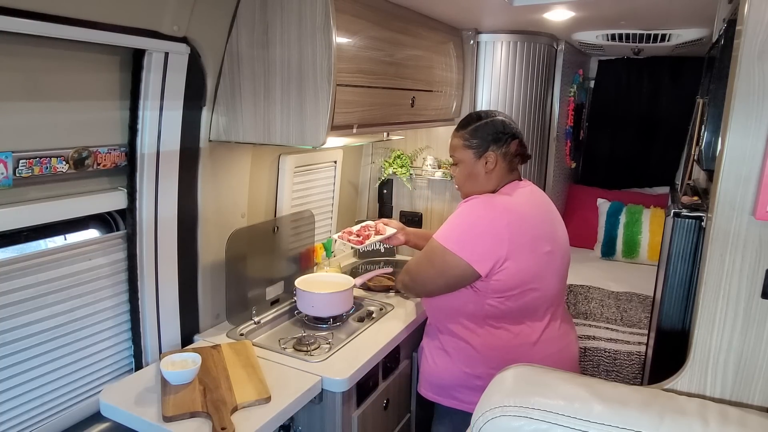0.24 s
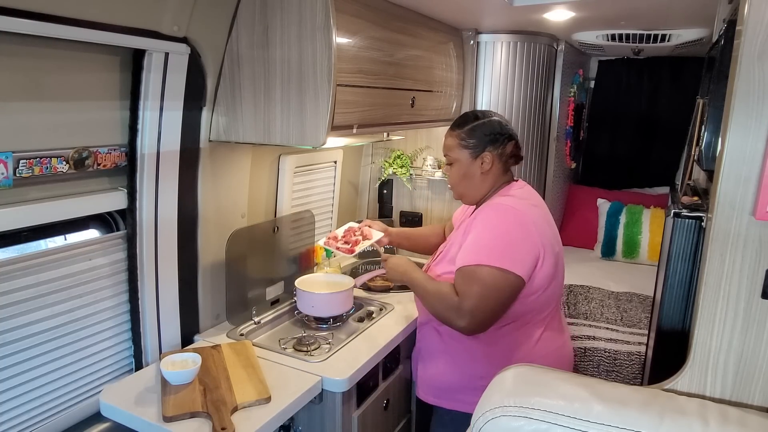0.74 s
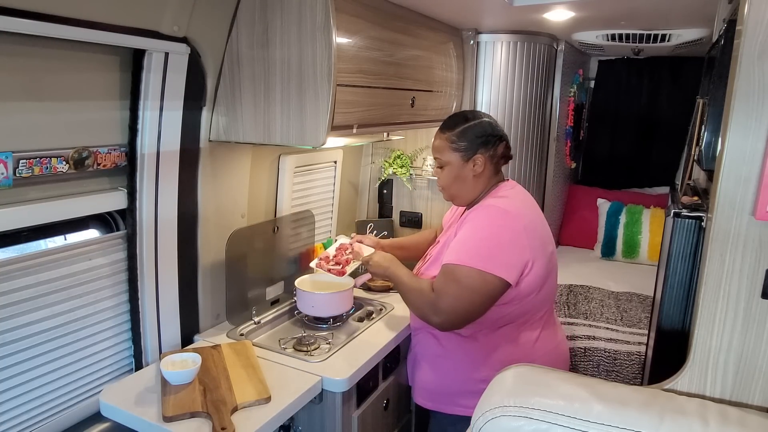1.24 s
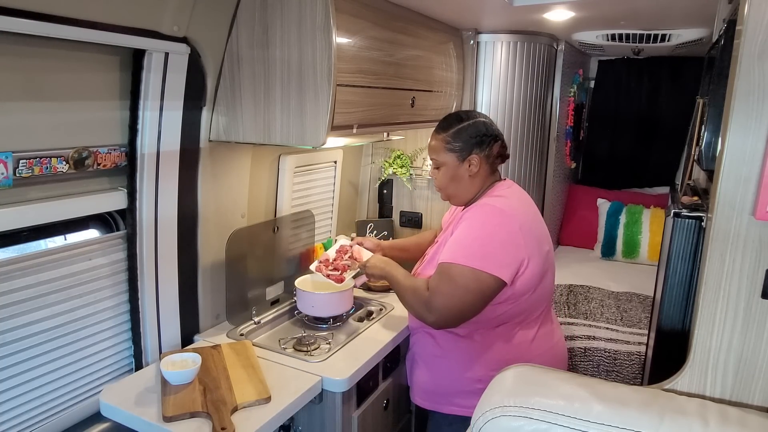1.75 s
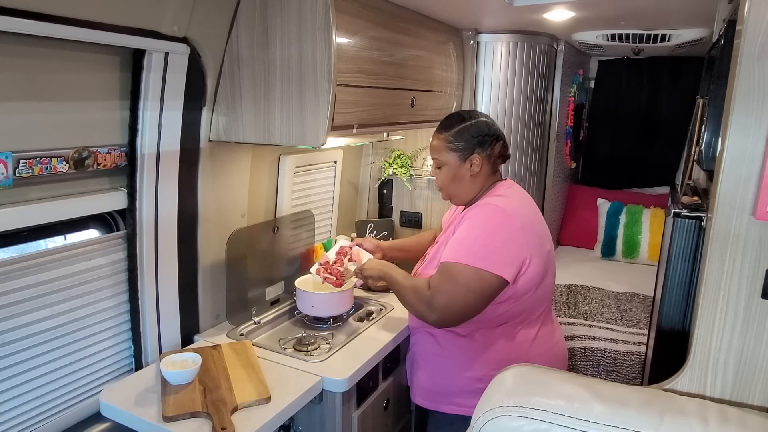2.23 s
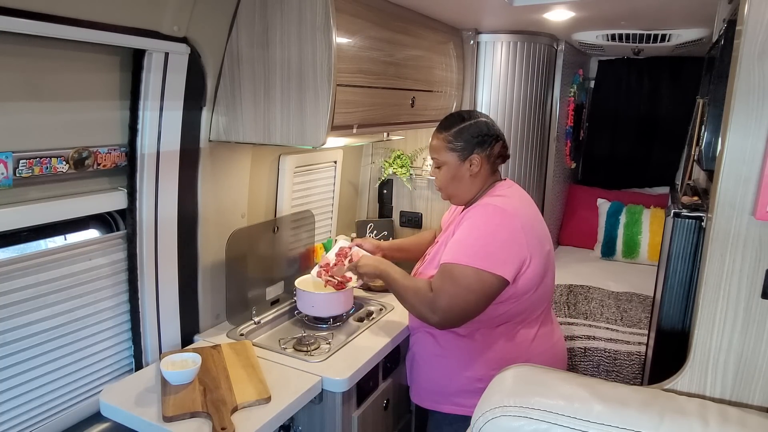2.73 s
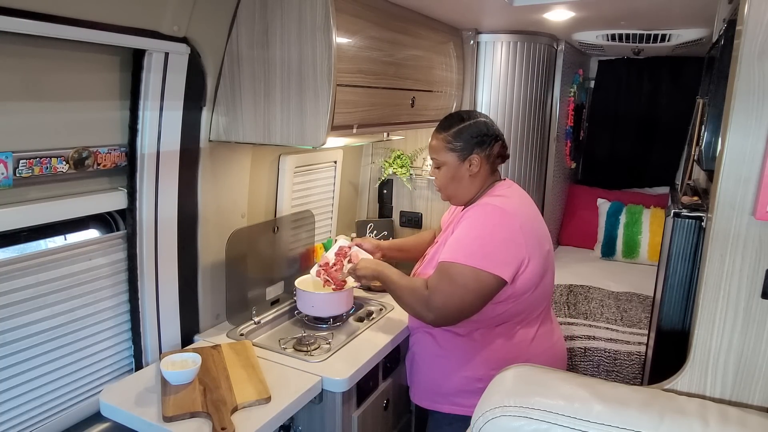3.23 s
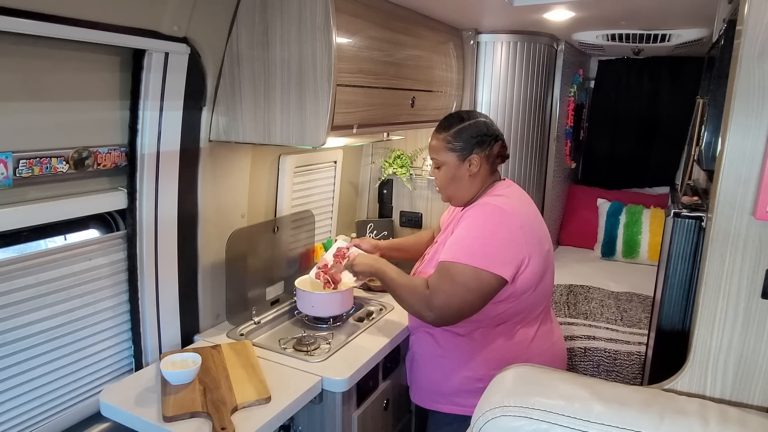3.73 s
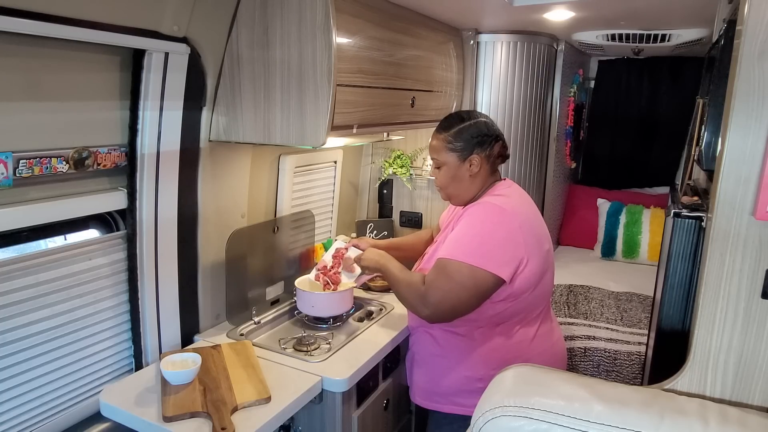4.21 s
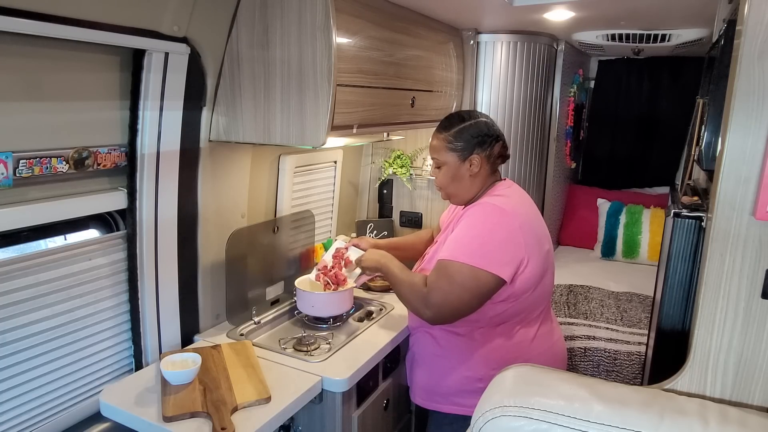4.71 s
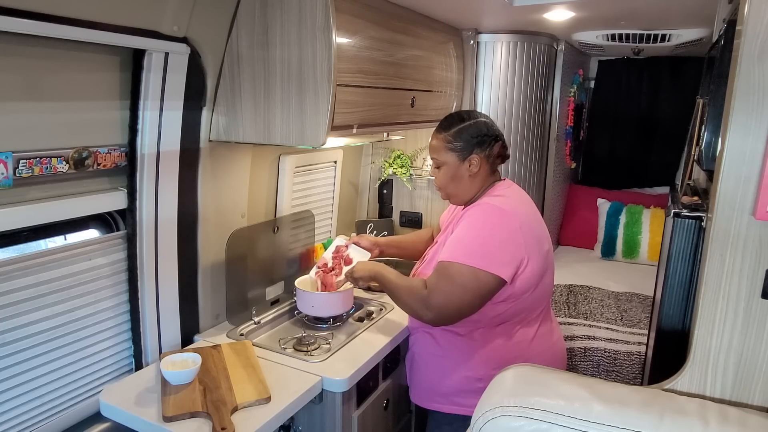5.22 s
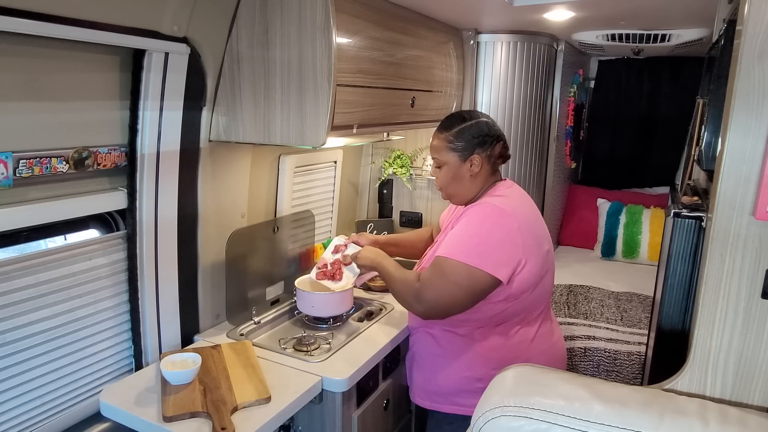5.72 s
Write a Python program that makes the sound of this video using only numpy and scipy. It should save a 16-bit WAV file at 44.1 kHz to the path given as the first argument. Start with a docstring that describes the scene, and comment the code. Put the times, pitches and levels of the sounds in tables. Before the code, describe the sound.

A hollow worktop clatter, then hard utensil knocks on a saucepan with wet meat slaps and crackling rustles, over low rumble and thin regular chirps.

```python
"""A hollow clatter on the worktop comes first, in the small kitchen of a camper van, over low rumble and hiss.
Raw beef is then pushed off a plate into a saucepan on a gas hob, with crackling rustles, wet slaps and pops.
A utensil knocks plate and pan, and the pan rocks on its grate. Blows are noise plus damped modes off close walls.
A faint whistle of narrow tones comes and goes; thin, regular electronic chirps are bursts of narrow noise.
All is placed before a microphone pair by level, phase and likeness between left and right."""
import sys
import numpy as np
from scipy import signal
from scipy.fft import rfft, irfft
from scipy.io import wavfile
from scipy.ndimage import uniform_filter1d

SR = 44100
rng = np.random.default_rng(int(sys.argv[2]) if len(sys.argv) > 2 else 0)


def transcribe(signal):
    """Save signal, clipped to [-1, 1], as a 16-bit WAV file at the path in sys.argv[1]."""
    frames = np.atleast_2d(signal).T
    limited = np.clip(frames, -1, 1)
    pcm = np.round(limited * 32767).astype(np.int16)
    wavfile.write(sys.argv[1], SR, pcm)


N = 262836
TIME = np.arange(N) / SR   # s into the scene
AGE = np.arange(-256, 24320) / SR   # s since a single sound began

# The microphone pair. Each row: frequency in Hz, likeness of left and right from 0 to 1,
# phase by which left leads in radians, level of left over right in dB.
MIC_PAIR = [(60, 0.94, 0.43, -3.5), (197, 0.89, 0.43, 0.1), (655, 0.5, 1.76, -1.5), (1150, 0.6, 1.95, 1.5),
            (2700, 0.8, 1.59, 1.54), (4900, 0, 2.19, -0.3), (11900, 0, 1.94, 5.5)]
CUTOFF_HZ = 16000

# Rumble of the place. Each row: frequency in Hz, relative density in dB.
RUMBLE_COLOUR = [(12, -43), (20, -2.5), (75, 0.5), (119, -25.5), (300, -23.5), (341, -22), (398, -19.5),
                 (820, -31.5), (1180, -24.5), (1340, -30), (1450, -28), (3220, -30), (3470, -26.5),
                 (3950, -27), (9500, -39.5), (12400, -66), (20900, -120)]
# Hiss at the top. Each row: frequency in Hz, relative density in dB.
HISS_COLOUR = [(7000, -40), (9500, -6), (11000, 0), (16000, 0)]
RUMBLE_DB, HISS_DB = -58.31, -74
# Tones of the whistle. Each row: centre in Hz, width in Hz, relative level in dB.
WHISTLE_TONES = [(3397, 5, 7), (3480, 14, -7), (3785, 12, -17)]
# Swells of the whistle. Each row: start in seconds, length in seconds, level in dB before trim,
# release in dB per second.
WHISTLE_SWELLS = [(0.93, 0.5, -71, 84.5), (2.32, 0.1, -66, 31), (2.92, 0.077, -65.5, 152)]
WHISTLE_ATTACK_DB_PER_S, WHISTLE_REST_DB = 132, -85.5   # the rest level lies under the swells

# One round of electronic chirping. Each row: offset into the round in seconds, level in dB before trim,
# centre in Hz.
CHIRPS = [(0.009, -55, 11400), (0.010, -57, 12200), (0.049, -53, 11900), (0.064, -57, 11300)]
CHIRP_START_S, CHIRP_PERIOD_S = -0.0318, 0.1603

# Edges of the bands in which a blow is levelled, in Hz.
BAND_EDGES_HZ = [60, 125, 350, 850, 1500, 2800, 4500, 7500, 10800]
THUD_HZ = 181   # where the weight of a blow is heard
# Things handled on the worktop. Each row: start in seconds, level in dB before trim, contact pitch in Hz,
# softness in dB lost per octave above it, thud in dB before trim,
# ringing over contact noise in dB before the bands are levelled.
CLUNKS = [(0.0, -43, 1356, 4, -41.5, -0.5), (0.102, -42, 1150, 10, -56, 4),
          (0.3845, -24.5, 1204, 2.63, -27, 2), (0.8155, -44.5, 600, -2, -57.5, -8)]
# Wet meat shifts, peels off the plate and lands. Each row: the same six columns and units as the clunks.
SLAPS = [(0.528, -56.5, 1254, -1, -76, -34), (3.701, -47, 2784, -0.5, -84, -25),
         (3.748, -34.5, 558, 2.5, -70, -0.5), (3.784, -40, 1200, 5, -56, -31),
         (5.272, -54, 1180, 0.5, -77, -24), (5.315, -46, 600, 1, -68, -8),
         (5.394, -42.5, 1790, -0.7, -51, 0), (5.467, -38.5, 1500, 10, -77, -10)]
# Utensil and plate knock on the pan. Each row: the same six columns and units as the clunks.
KNOCKS = [(2.399, -14, 2200, 9.5, -45.5, 3.5), (2.526, -19, 980, 13.5, -57, 7),
          (2.545, -24.5, 1560, 12.5, -40.5, 8), (2.575, -29.5, 1250, 11.5, -70, 4.5),
          (3.009, -27, 1310, 6.5, -55, 3), (3.303, -22.5, 1270, 7, -50.5, 5),
          (4.187, -44, 1144, 3.5, -52.5, -4.5), (4.279, -21, 1816, 5.5, -53, 0.5),
          (4.311, -18, 1380, 4, -41.5, 1.5), (4.445, -19, 1500, 6, -40, 4), (4.793, -42.5, 1197, 5, -54, 7),
          (4.895, -44, 1260, 6.5, -54.5, 4), (4.9945, -23.5, 1504, 5, -44, 7),
          (5.249, -40.5, 1380, 5.5, -52, 0.5), (5.825, -35.5, 1334, 7.5, -56, 3.5)]
# Modes of the worktop. Each row: nominal pitch in Hz, nominal relative level in dB, t60 in seconds.
WORKTOP_MODES = [(86.8, 16.5, 0.38), (167.3, -7, 0.36), (195, 2, 0.25), (217.6, -7.5, 0.27),
                 (293, -16.5, 0.25), (574, 10.5, 0.25), (805, -8.5, 0.33), (1366, -1.5, 0.29),
                 (1430, 10, 0.14), (1796, -7.5, 0.36), (1957, 2, 0.23), (2045, 4.5, 0.11),
                 (2107, 10.5, 0.073), (2246, 1, 0.23), (2610, 0, 0.16), (2970, 10, 0.08), (2940, -6, 0.23),
                 (3646, 17.5, 0.061)]
# Modes of the pan's hollow. Each row: nominal pitch in Hz, nominal relative level in dB, t60 in seconds.
HOLLOW_MODES = [(577, 6.5, 0.49), (1740, -9, 0.3)]
# Modes of the pan. Each row: nominal pitch in Hz, nominal relative level in dB, t60 in seconds.
PAN_MODES = [(84.6, -14.5, 0.4), (164.1, -10.5, 0.28), (213.9, -15, 0.41), (576, -5.5, 0.23),
             (801, -18, 0.15), (1050, -9, 0.14), (1172, -14, .13), (1445, -10, 0.16), (1700, -5, .11),
             (1775, -1.5, .13), (1966, -3.5, .11), (2094, 0, .11), (3288, -4, .08), (3392, -3, .085),
             (3802, -5, .08), (2166, -7, .11), (2307, -5.5, 0.074), (2450, -9.5, 0.09), (2564, -1, 0.073),
             (2960, -13, 0.087), (3120, -9.5, 0.14), (4180, -11.5, 0.074), (4730, -23, 0.13),
             (5280, -21, 0.1), (5580, -8.5, 0.025), (5950, -23.5, 0.13), (6280, -18.5, 0.055),
             (7100, -15, 0.047)]
# Contact noise on the worktop. Each row: frequency in Hz, relative density in dB.
CLUNK_COLOUR = [(60, -4.5), (200, -21), (330, -13), (500, -9.5), (800, -8.5), (1200, -11.5), (1600, -14),
                (2300, -13.5), (3300, -6), (4300, -8), (6500, -24), (10000, -46.5), (16000, -54)]
# Wet contact noise. Each row: frequency in Hz, relative density in dB.
SLAP_COLOUR = [(150, -20), (400, -2.5), (650, 11), (1200, 0), (2500, -15), (4300, -17.5), (5400, -11),
               (8000, 4.5), (11000, -7.5), (16000, -4.5)]
# Contact noise on the pan. Each row: frequency in Hz, relative density in dB.
KNOCK_COLOUR = [(71, -38.5), (120, -18.5), (177, -2), (493, -14), (569, -14.5), (643, -3.5), (1030, -8),
                (1620, -8.5), (1790, 0.5), (3050, -6.5), (3380, -4.5), (4980, -25.5), (7050, -29.5),
                (11800, -38.5), (16000, -89.5)]

# Crackling rustles: one at the worktop, faint treble ticks, and meat sliding into the pan.
# Each row: start in seconds, length in seconds, level in dB before trim, release in dB per second.
RUSTLES = [(0.36, 0.13, -50.5, 95), (1.51, 0.061, -64.5, 393), (3.70, 0.1, -52.5, 525),
           (4.08, 0.011, -63.5, 498), (5.28, 0.14, -50.5, 190)]
# Rustling contact noise. Each row: frequency in Hz, relative density in dB.
RUSTLE_COLOUR = [(300, -18), (1200, -10), (3000, -6.5), (4500, -2), (8000, -3), (11000, -2), (16000, -16)]
RUSTLE_ATTACK_DB_PER_S = 312
POURING_FROM_S = 3.0   # only later rustles squelch

# The pan tips on its grate and falls back, often almost unheard. Each row: start in seconds,
# tip level in dB before trim, dB lost in falling back (negative: the return is louder).
ROCKS = [(0.532, -51, 5.5), (2.644, -37, 24), (2.736, -50.5, 22), (3.077, -39, 34), (3.828, -35, 24),
         (3.902, -35, 13.5), (4.258, -35, -11), (4.548, -46.5, 20), (4.814, -37.5, 1), (4.926, -38.5, -6),
         (5.068, -35.5, 5), (5.306, -32.5, 32), (5.446, -33, 7.5), (5.547, -44, 5), (5.654, -38.5, 11),
         (5.727, -44, 7.5)]
# Thud of a rocking pan. Each row: frequency in Hz, relative density in dB.
ROCK_COLOUR = [(100, -5), (180, -3.5), (340, -3.5), (480, -14), (750, -1), (1100, -12.5), (1550, -12),
               (2400, -11.5), (4000, -22.5), (9000, -43), (16000, -60)]
FALL_BACK_S = 0.04   # from the tip to the fall back
# nominal pitch of a tock of that level before trim; harder ones are higher
ROCK_HZ, ROCK_AT_DB, ROCK_HZ_PER_DB = 1104, -39, 6.5

# Single tones that sing on. Each row: start in seconds, pitch in Hz, early level in dB, t60 in seconds.
AFTER_RINGS = [(0.535, 1102, -58, 0.27), (2.575, 1775, -51, 0.46), (3.009, 1800, -56, 0.62),
               (3.303, 1743, -50.5, 0.43), (4.311, 574, -36, 0.45), (4.995, 577, -49.5, 0.71),
               (4.995, 1792, -32.5, 0.19)]
# Air pockets pop in the wet meat. Each row: start in seconds, early level in dB, starting pitch in Hz,
# rise in octaves per second.
POPS = [(3.71, -45.5, 2036, 24), (3.728, -44.5, 5160, 6.5), (3.732, -47, 1400, 57), (3.788, -43, 2516, 9.2),
        (5.364, -45.5, 3080, 71), (5.394, -39, 4960, 21), (5.457, -52.5, 2860, 13),
        (5.467, -42.5, 1230, 16)]


def from_db(db):
    """Decibels to gain."""
    return 10 ** (np.asarray(db) / 20)


def rms_one(x):
    """Scale to rms 1."""
    return x / np.sqrt(np.mean(x ** 2) + 1e-20)


def at_hz(points, hz, axis=1):
    """Read one column of a table along log frequency."""
    points = np.array(points, float)
    return np.interp(np.log(np.maximum(hz, 1)), np.log(points[:, 0]), points[:, axis])


def fade(t60, rise):
    """Envelope of a blow: swells from age zero, then dies away."""
    age = np.maximum(AGE, 0)
    return (1 - np.exp(-age / rise)) * from_db(-60 * age / t60)


def swells(rows, attack_db_per_s):
    """Gain over time: each swell rises, holds and is released."""
    gain = 0
    for start_s, length_s, db, release_db_per_s in rows:
        before = np.maximum(start_s - TIME, 0)
        after = np.maximum(TIME - start_s - length_s, 0)
        gain = gain + from_db(db - attack_db_per_s * before - release_db_per_s * after)
    return gain


def add(out, s, sound):
    """Mix a sound in so that its age zero falls at s."""
    start = round((s + AGE[0]) * SR)
    first, last = max(start, 0), min(start + len(AGE), N)
    if last > first:
        out[:, first:last] += sound[:, first - start:last - start]


def noise(gain_at, size):
    """Stereo noise of a given spectrum as the microphone pair hears it; rms 1."""
    hz = np.fft.rfftfreq(size, 1 / SR)
    right, other = rfft(rng.standard_normal((2, size)))
    alike = np.clip(at_hz(MIC_PAIR, hz, axis=1), 0, 1)
    shared = alike * right * np.exp(1j * at_hz(MIC_PAIR, hz, axis=2))
    left = shared + np.sqrt(1 - alike ** 2) * other
    lean = from_db(at_hz(MIC_PAIR, hz, axis=3) / 2)
    return rms_one(irfft(np.array([left * lean, right / lean]) * gain_at(hz), size))


def coloured(spectrum, size):
    """Noise that follows a table of frequency in Hz and density in dB."""
    return noise(lambda hz: from_db(at_hz(spectrum, hz)), size)


def resonant(centre_hz, width_hz, size):
    """Noise in one steep-sided resonance."""
    return noise(lambda hz: 1 / (1 + np.abs(2 * (hz - centre_hz) / width_hz) ** 3), size)


def grains(grain_db, size):
    """A gain that jumps about every two milliseconds."""
    wander = rms_one(uniform_filter1d(rng.standard_normal(size), size=90))
    return rms_one(from_db(grain_db * wander))


def ring(modes, spread_db, detune):
    """Modes vary in strength and pitch with grip and contact point; low ones build up more slowly."""
    out = np.zeros((2, len(AGE)))
    for hz, db, t60 in modes:
        strength, turn, skew, shift = rng.standard_normal(4)
        lead = at_hz(MIC_PAIR, hz, axis=2) + skew * (1 - at_hz(MIC_PAIR, hz, axis=1))
        lean = from_db(at_hz(MIC_PAIR, hz, axis=3) / 2)
        phase = 2 * np.pi * (hz * (1 + detune * shift) * AGE + turn)
        wave = np.sin(phase + np.array([[lead], [0]])) * [[lean], [1 / lean]]
        out += from_db(db + spread_db * strength) * wave * fade(t60, 2 / hz)
    return rms_one(out)


def cabin(sound, t60, crack_db, tail_db, rise_s=0.01):
    """A contact is heard as a direct crack, dense reflections off close walls and a faint tail."""
    reflections = fade(t60, rise_s)
    crack = from_db(crack_db) * fade(0.0079, 0.00027)
    tail = from_db(tail_db) * fade(0.86, 0.0088)
    return rms_one(sound * (reflections + crack + tail))


def contact_db(hz, db, pitch_hz, softness, thud_db, rise_db_per_octave, top_hz, thud_db_per_octave):
    """Spectrum of a blow: a hump at the contact pitch, duller above it the softer the touch, and a low thud."""
    octaves = np.log2(hz / pitch_hz)
    slope_db = rise_db_per_octave * np.minimum(octaves, 0) - softness * np.maximum(octaves, 0)
    hump = from_db(db + slope_db) / np.hypot(1, (hz / top_hz) ** 2)
    thud = from_db(thud_db - thud_db_per_octave * np.abs(np.log2(hz / THUD_HZ)))
    return 20 * np.log10(np.hypot(hump, thud))


def voice(blow, band_db):
    """Place and hardness of the contact set how strongly each band speaks in the first moments."""
    hz, tilt = np.fft.rfftfreq(len(AGE), 1 / SR), []
    for low, high, db in zip(BAND_EDGES_HZ, BAND_EDGES_HZ[1:], band_db):
        window_s = 0.08 if low < 350 else 0.03   # low bands need longer to speak
        in_band = (hz >= low) & (hz < high)
        early = np.abs(rfft(blow * (AGE < window_s))[:, in_band]) ** 2
        early_db = 10 * np.log10(early.sum() / (len(AGE) * window_s * SR))
        tilt.append((np.sqrt(low * high), db - early_db))
    closing = np.clip((AGE[-1] - AGE) / 0.15, 0, 1) ** 2   # ends in silence
    return irfft(rfft(blow) * from_db(at_hz(tilt, hz))) * closing


def blows(table, colour, modes, trim_db, t60, crack_db, tail_db, spread_db, detune, grain_db, **touch):
    """Each blow is grainy contact noise in the cabin plus the ringing of the struck thing."""
    out = np.zeros((2, N))
    centres_hz = np.sqrt(np.multiply(BAND_EDGES_HZ[:-1], BAND_EDGES_HZ[1:]))
    for s, db, pitch_hz, softness, thud_db, ring_db in table:
        band_db = contact_db(centres_hz, db, pitch_hz, softness, thud_db, **touch)
        grainy = coloured(colour, len(AGE)) * grains(grain_db, len(AGE))
        contact = cabin(grainy, t60, crack_db, tail_db)
        ringing = from_db(ring_db) * ring(modes, spread_db, detune)
        add(out, s, voice(contact + ringing, band_db + trim_db))
    return out


def whistle_tone(hz, width_hz):
    """A tone of even strength and slightly unsteady pitch, reaching the left microphone first."""
    phase = np.angle(signal.hilbert(resonant(hz, width_hz, N)[0]))
    return np.cos(phase + np.array([[at_hz(MIC_PAIR, hz, axis=2)], [0]]))


def background(swell_trim_db=-2):
    """Rumble, hiss and a thin whistle of slightly unsteady pitch that comes and goes."""
    tones = sum(from_db(db) * whistle_tone(hz, width_hz) for hz, width_hz, db in WHISTLE_TONES)
    rumble = from_db(RUMBLE_DB) * coloured(RUMBLE_COLOUR, N)
    hiss = from_db(HISS_DB) * coloured(HISS_COLOUR, N)
    swelling = from_db(swell_trim_db) * swells(WHISTLE_SWELLS, WHISTLE_ATTACK_DB_PER_S)
    return rumble + hiss + (from_db(WHISTLE_REST_DB) + swelling) * rms_one(tones)


def chirping(trim_db=-1, width_hz=900, burst_s=0.0043, echo_db=-7):
    """Electronics chirp in a fixed pattern of narrow noise bursts, each smeared by the cabin."""
    out = np.zeros((2, N))
    burst = np.interp(AGE, [0, 0.001, burst_s, burst_s + 0.0075], [0, 1, 1, 0])
    shape = burst + from_db(echo_db) * fade(0.41, 0.0006)
    for offset_s, db, hz in CHIRPS:
        envelope = np.zeros((2, N))
        for s in np.arange(CHIRP_START_S, N / SR, CHIRP_PERIOD_S):
            add(envelope, s + offset_s, np.array([shape, shape]))
        out += from_db(db + trim_db) * envelope * resonant(hz, width_hz, N)
    return out


def clunks():
    """The hollow worktop booms under a bright clack."""
    return blows(CLUNKS, CLUNK_COLOUR, WORKTOP_MODES, trim_db=2.0, t60=0.1, crack_db=-1.5, tail_db=-39.5,
                 spread_db=1, detune=0.0015, grain_db=1.5,
                 rise_db_per_octave=17, top_hz=5960, thud_db_per_octave=11.5)


def rustling(trim_db=-3, clicks_per_s=420, size_db=5, smear_db=-3):
    """Separate tiny crackles of things sliding or rustling."""
    happens = rng.random(N) < clicks_per_s / SR
    size = from_db(size_db * np.minimum(rng.exponential(1, N), 3))
    clicks = happens * size * rng.choice([-1, 1], N)
    contact = coloured(RUSTLE_COLOUR, len(AGE))
    smear = from_db(smear_db) * rms_one(contact * fade(0.082, 0.0018))
    crackle = rms_one(contact * fade(0.019, 0.00025)) + smear
    crackles = signal.fftconvolve(clicks[None], crackle[:, AGE >= 0], axes=1)[:, :N]
    return from_db(trim_db) * swells(RUSTLES, RUSTLE_ATTACK_DB_PER_S) * rms_one(crackles)


def slaps():
    """Wet smacks that wake the hollow of the pan."""
    return blows(SLAPS, SLAP_COLOUR, HOLLOW_MODES, trim_db=-3.0, t60=0.077, crack_db=-5.5, tail_db=-34.0,
                 spread_db=5.0, detune=0.0079, grain_db=-2.5,
                 rise_db_per_octave=15.5, top_hz=15200, thud_db_per_octave=11)


def rocking(trim_db=-9.0, tock_db=6, scatter_db=2, thud_db=2.0, width_hz=240):
    """Small pitched tocks, some with a clear second tock, others with almost none.

    Each is one quickly damped mode, its scatter off the walls and a soft thud."""
    out = np.zeros((2, N))
    for start, tip_db, loss_db in ROCKS:
        for s, peak_db in (start, tip_db), (start + FALL_BACK_S, tip_db - loss_db):
            hz = ROCK_HZ + ROCK_HZ_PER_DB * (peak_db - ROCK_AT_DB)
            tock = ring([(hz, 0, 0.028)], spread_db=0, detune=0.012)
            scatter = cabin(resonant(hz, width_hz, len(AGE)), t60=0.092, crack_db=-6, tail_db=-29,
                            rise_s=0.0066)
            thud = cabin(coloured(ROCK_COLOUR, len(AGE)), t60=0.1, crack_db=-9, tail_db=-25)
            mixed = from_db(tock_db) * tock + from_db(scatter_db) * scatter + from_db(thud_db) * thud
            add(out, s, from_db(peak_db + trim_db) * mixed / np.std(mixed[:, AGE < 0.02]))
    return out


def after_rings():
    """Where nothing damps it, a single mode outlasts the blow."""
    out = np.zeros((2, N))
    for s, hz, db, t60 in AFTER_RINGS:
        closing = np.clip(1 - AGE / AGE[-1], 0, 1) ** 0.5
        tone = ring([(hz, 0, t60)], spread_db=0, detune=0) * closing
        add(out, s, from_db(db) * tone / np.std(tone[:, AGE < 0.05]))
    return out


def knocks():
    """Hard, short blows on the pan, damped by the hand and the meat."""
    return blows(KNOCKS, KNOCK_COLOUR, PAN_MODES, trim_db=-1.72, t60=0.13, crack_db=-6.0, tail_db=-49.5,
                 spread_db=5.5, detune=0.0033, grain_db=-0.1,
                 rise_db_per_octave=14.5, top_hz=4900, thud_db_per_octave=9.5)


def rising_note(hz, octaves_per_s, rise_until_s):
    """An air pocket sings upward from its starting pitch, then holds."""
    age = np.clip(AGE, 0, rise_until_s)
    return np.sin(2 * np.pi * np.cumsum(hz * 2 ** (octaves_per_s * age)) / SR)


def squelch(per_s=160, trim_db=-9, spread_db=3, low_hz=1100, high_hz=5000, octaves_per_s=8, t60=0.02, wet_db=3):
    """During the later rustles, tiny air pockets burst at random, each with a brief rising note."""
    out = np.zeros((2, N))
    effort = swells(RUSTLES, RUSTLE_ATTACK_DB_PER_S) * (TIME > POURING_FROM_S)
    chance = per_s / SR * (effort / effort.max()) ** 2   # per_s is reached at full effort
    for at in np.flatnonzero(rng.random(N) < chance):
        hz = low_hz * (high_hz / low_hz) ** rng.random()
        note = rising_note(hz, octaves_per_s, 0.03) * fade(t60, 0.000384)
        walls = cabin(resonant(hz, hz / 2, len(AGE)), t60=0.03, crack_db=5, tail_db=-45, rise_s=0.0017)
        mixed = rms_one(note) + from_db(wet_db) * walls
        level = effort[at] * from_db(trim_db + spread_db * rng.standard_normal())
        add(out, at / SR, level * mixed / np.std(mixed[:, AGE < 0.01]))
    return out


def pops(note_t60_s=0.022, wet_db=28.5, walls_t60_s=0.11):
    """Each pocket sings a short rising note, which the close walls scatter."""
    out = np.zeros((2, N))
    for s, db, hz, octaves_per_s in POPS:
        note = rising_note(hz, octaves_per_s, 0.05) * fade(note_t60_s, 0.00074)
        walls = cabin(coloured(SLAP_COLOUR, len(AGE)), t60=walls_t60_s, crack_db=10, tail_db=-51)
        scattered = signal.fftconvolve(note[None], walls[:, AGE >= 0], axes=1)[:, :len(AGE)]
        mixed = rms_one(note) + from_db(wet_db) * rms_one(scattered)
        add(out, s, from_db(db) * mixed / np.std(mixed[:, AGE < 0.025]))
    return out


def scene():
    """The cooking over the background of the cabin."""
    place = background() + chirping()
    handling = clunks() + knocks() + rocking() + after_rings()
    rustles_and_meat = rustling() + slaps() + squelch() + pops()
    return place + handling + rustles_and_meat


def record(dry):
    """The top is cut steeply by a low-pass."""
    low_pass = signal.ellip(10, 0.1, 70, CUTOFF_HZ, fs=SR, output="sos")   # order, ripple dB, rejection dB
    return signal.sosfilt(low_pass, dry)


dry = scene()
out = record(dry)
transcribe(out)
```